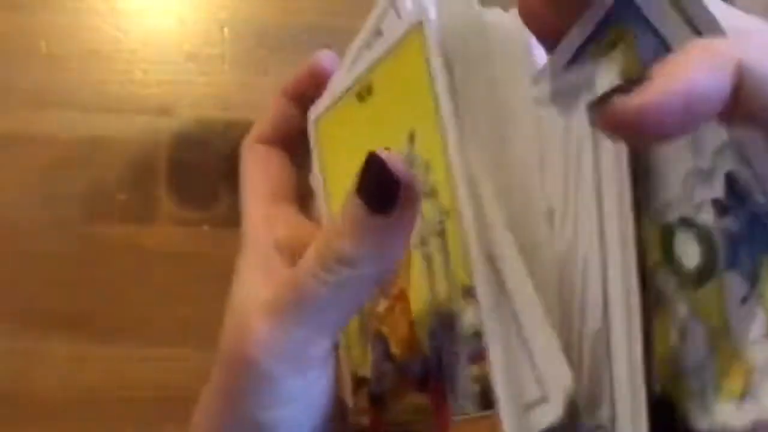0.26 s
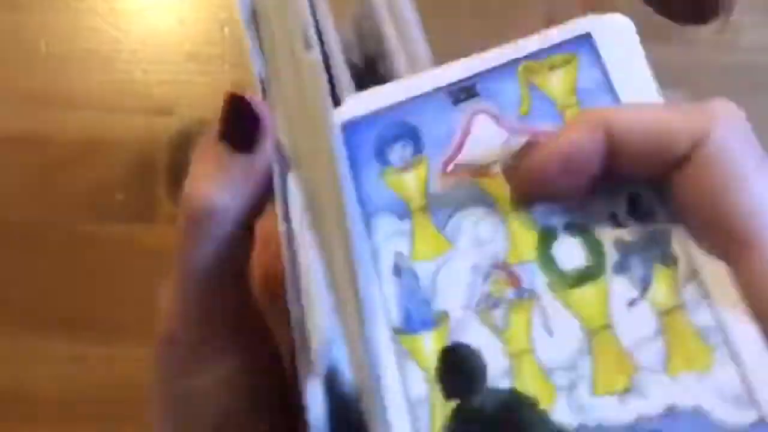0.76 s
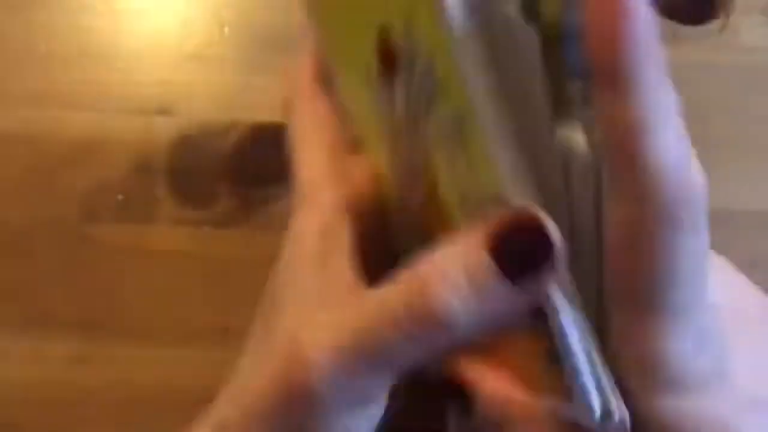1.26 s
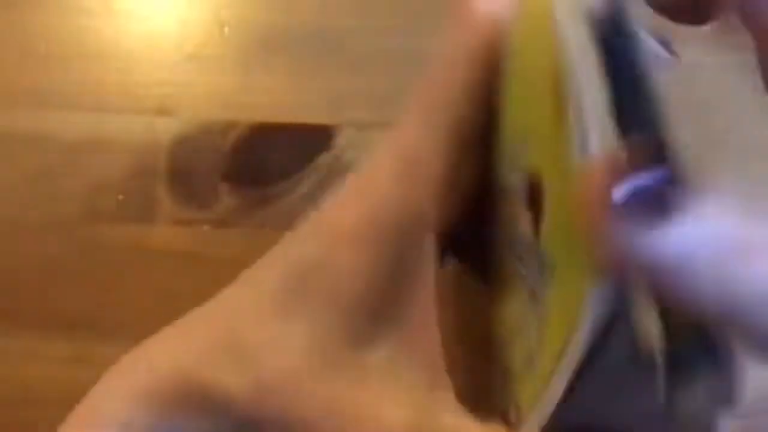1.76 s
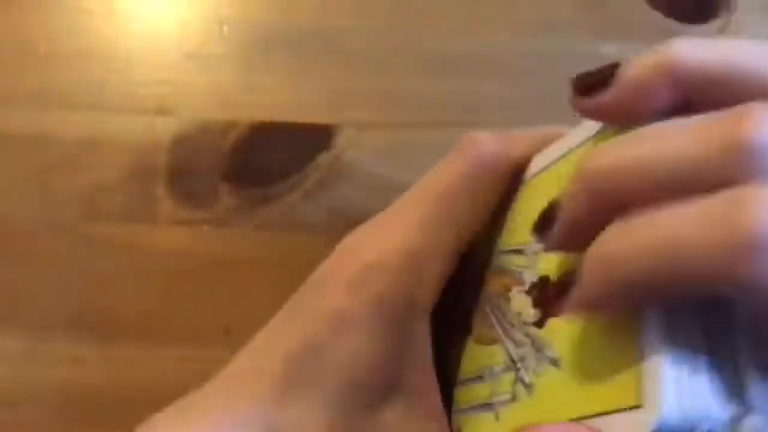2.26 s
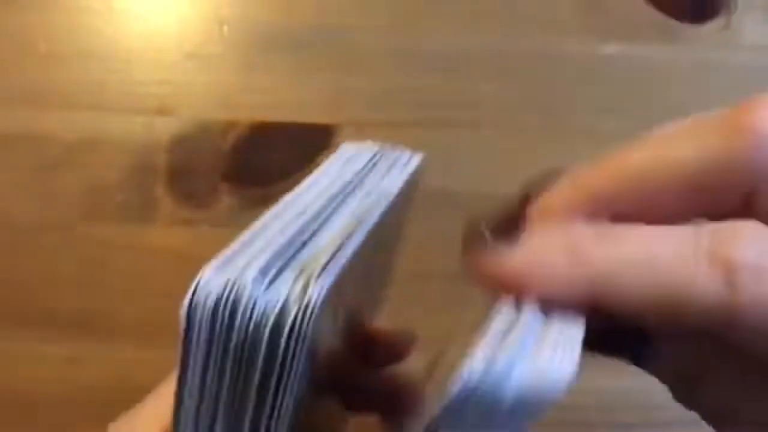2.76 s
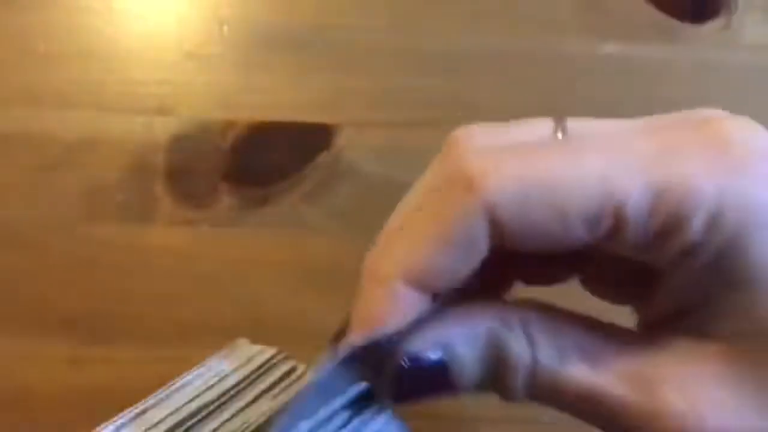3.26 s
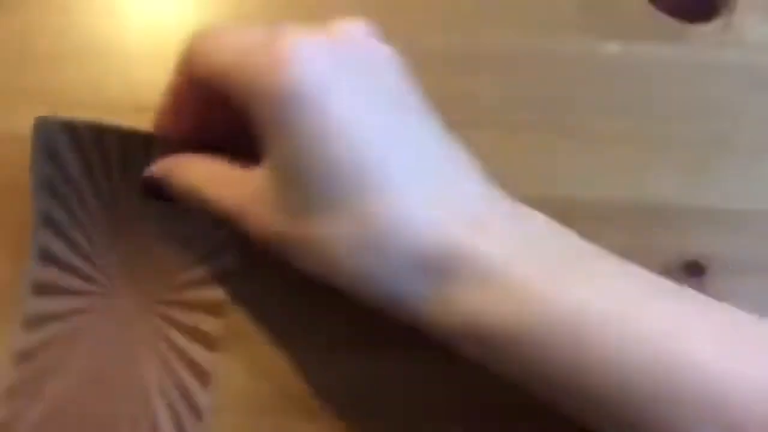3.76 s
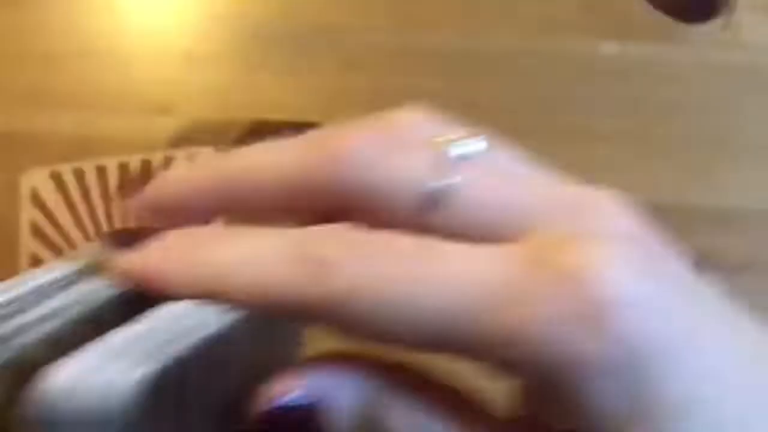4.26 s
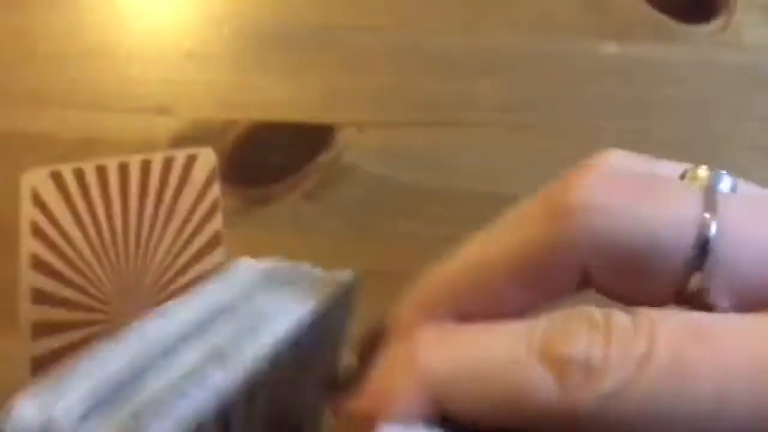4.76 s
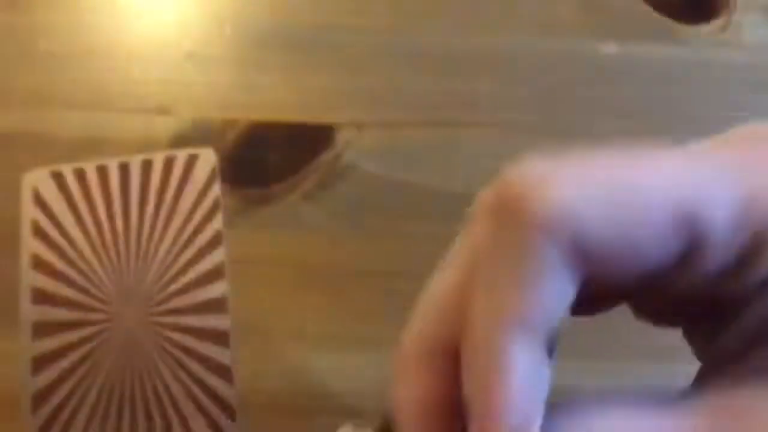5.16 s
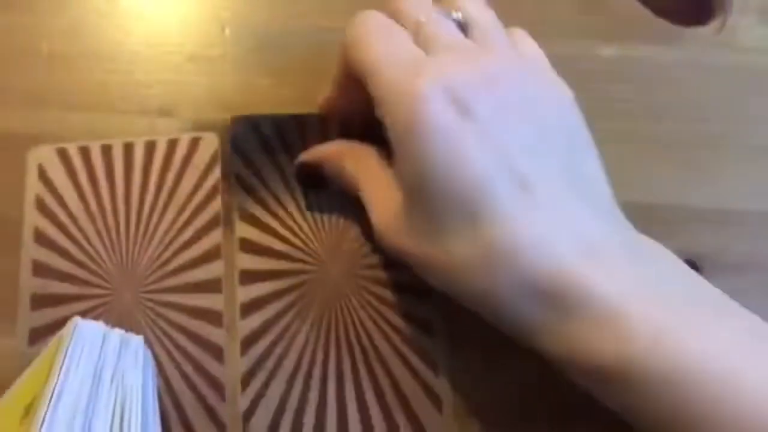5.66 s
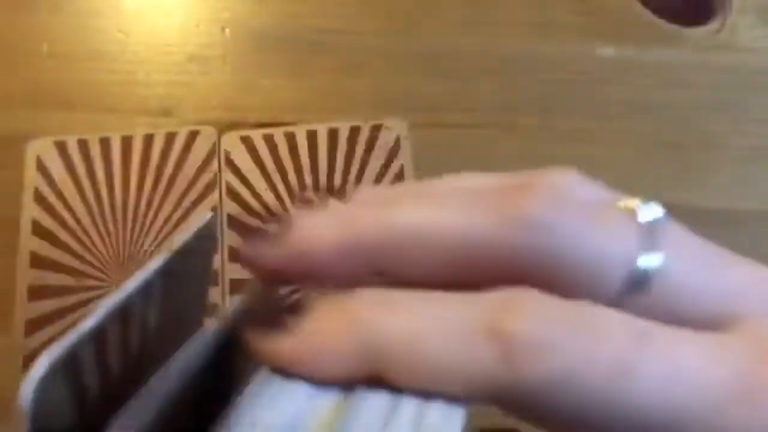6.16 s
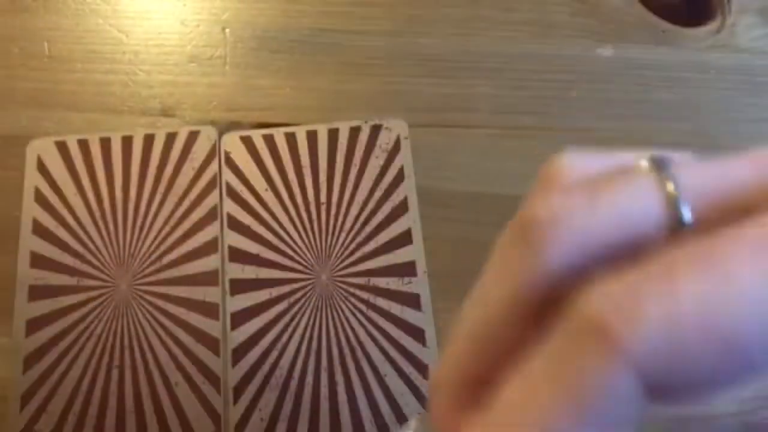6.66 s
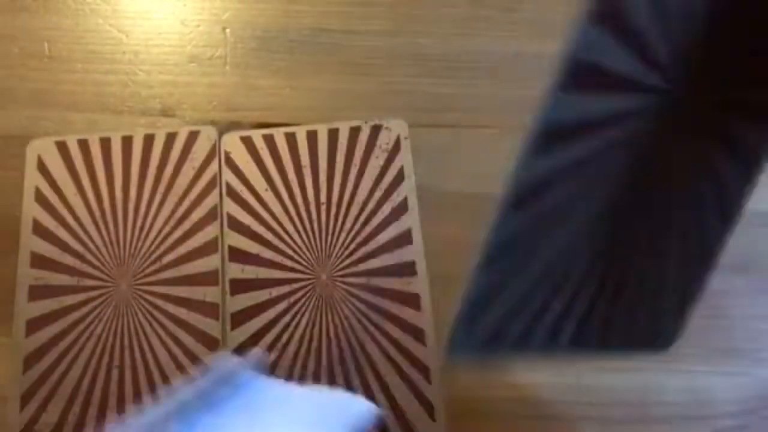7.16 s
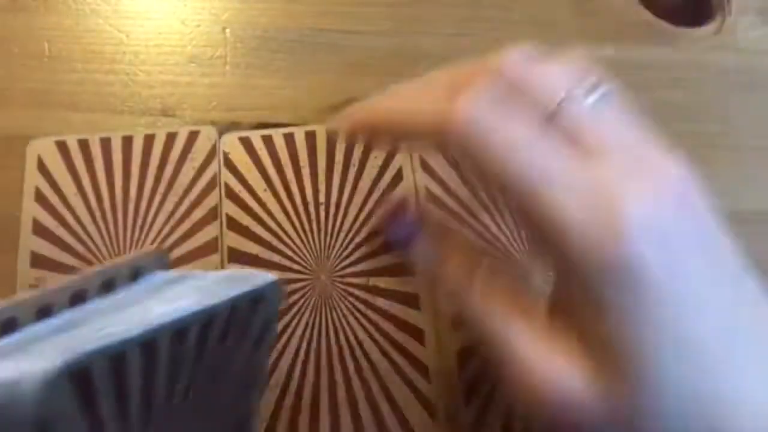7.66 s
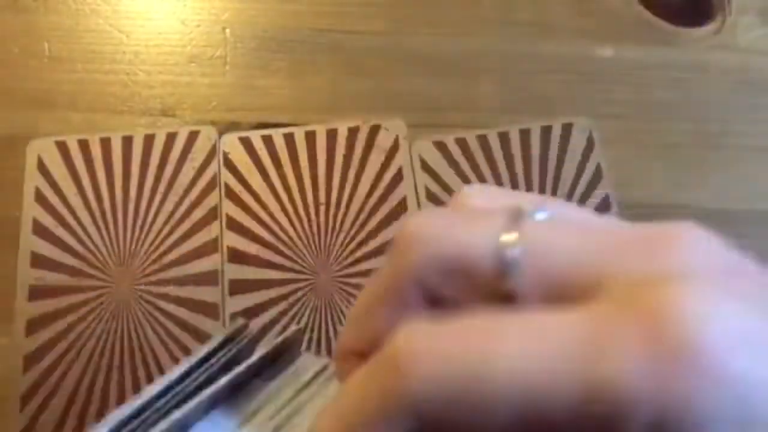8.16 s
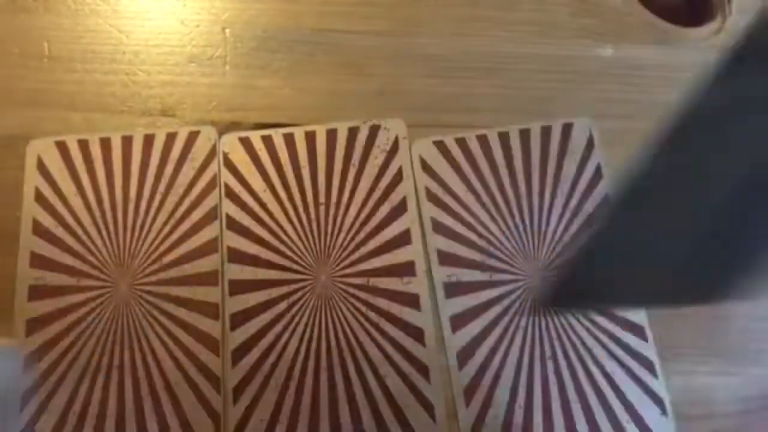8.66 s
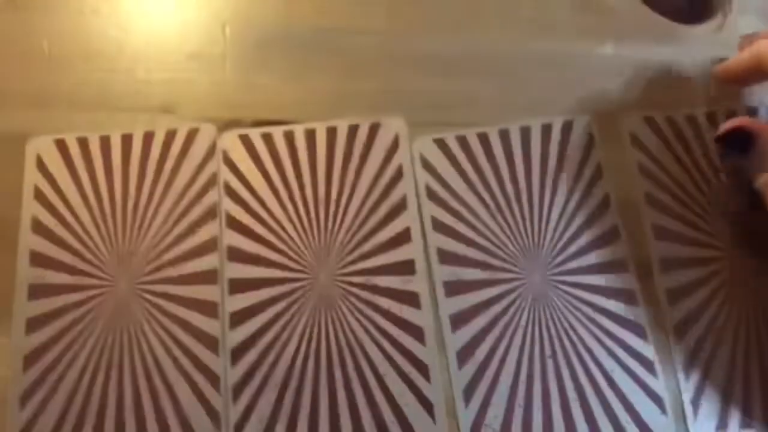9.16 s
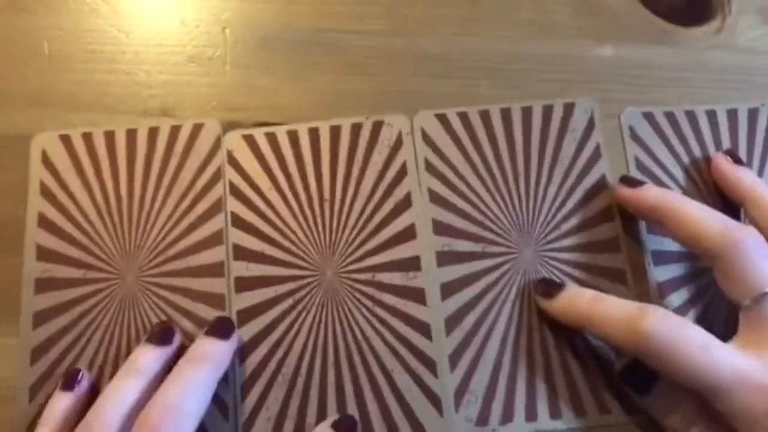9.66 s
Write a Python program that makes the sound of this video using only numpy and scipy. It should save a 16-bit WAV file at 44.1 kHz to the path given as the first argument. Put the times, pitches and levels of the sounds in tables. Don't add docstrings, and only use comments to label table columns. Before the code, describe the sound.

Close rustling and clicking of a hand-shuffled deck, a hard rap on wood, then four card flicks with soft landings and hissing slides.

```python
import sys
import numpy as np
from scipy import signal
from scipy.fft import rfft, irfft, next_fast_len
from scipy.io import wavfile

SR = 44100
rng = np.random.default_rng(int(sys.argv[2]) if len(sys.argv) > 2 else 0)


def gain_from_decibels(decibels):
    exponent = np.asarray(decibels, float) / 20
    return 10 ** exponent


def transcribe(signal):
    frames = np.atleast_2d(signal).T
    limited = np.clip(frames, -1, 1)
    pcm = np.round(limited * 32767).astype(np.int16)
    wavfile.write(sys.argv[1], SR, pcm)


N = 436590


def rms_one(x):
    return x / np.sqrt(np.mean(x ** 2) + 1e-20)


def peak_one(x):
    return x / (np.max(np.abs(x)) + 1e-12)


def lowpass(x, hz):
    return signal.sosfilt(signal.butter(2, hz, fs=SR, output="sos"), x)


def band(x, low_hz, high_hz):
    edges = [low_hz, min(high_hz, 0.49 * SR)]
    return signal.sosfilt(signal.butter(2, edges, "band", fs=SR, output="sos"), x)


def coloured(x, spectrum):
    hz, db = np.transpose(spectrum)
    size = next_fast_len(N)
    bins_hz = np.arange(size // 2 + 1) * SR / size
    gain_db = np.interp(np.log(bins_hz + 1), np.log(hz), db)
    return rms_one(irfft(rfft(x, size) * gain_from_decibels(gain_db), size)[:N])


def drift(rate):
    r = np.exp(-40 * np.pi * rate / SR)
    noise = rng.standard_normal(N // 20 + 2002)
    slow = rms_one(signal.lfilter([1], [1, -2 * r, r * r], noise)[2000:])
    return np.interp(np.arange(N) / 20, np.arange(len(slow)), slow)


def add(out, s, piece):
    i = max(round(s * SR), 0)
    out[i:i + len(piece)] += piece[:N - i]


# [Hz, dB per Hz]
ROOM_TONE = [(12, -34), (20, -4), (64, -4), (118, 0), (319, -12), (497, -15), (693, -14), (1640, -21),
             (3650, -23), (4820, -21), (5380, -18), (5850, -19), (7930, -21), (9900, -17), (15000, -20)]
ROOM_TONE_DB = -62.5
HUM_HZ, HUM_WIDTH_HZ, HUM_DB = 122, 21.5, -73


def room_tone():
    air = coloured(rng.standard_normal(N), ROOM_TONE)
    rumble = gain_from_decibels(-9.0 + 3.7 * drift(0.31)) * band(air, 5, 320)
    motor = band(rng.standard_normal(N), HUM_HZ - HUM_WIDTH_HZ / 2, HUM_HZ + HUM_WIDTH_HZ / 2)
    drone = gain_from_decibels(HUM_DB + 2.0 * drift(1.5)) * rms_one(motor)
    return gain_from_decibels(ROOM_TONE_DB + 0.98 * drift(0.6)) * (air + rumble) + drone


# [Hz, dB per Hz]
RUSTLE = [(120, -25), (200, -1.5), (650, -5), (804, -3), (900, -7), (1250, -8.5), (2750, -13),
          (4000, -15.5), (5200, -21), (8800, -120)]
# [s, dB]
HANDLING = [(0.0, -66), (0.13, -61.5), (1.2, -63), (1.85, -60), (1.98, -62), (2.21, -63), (2.26, -64),
            (3.1, -72), (3.3, -69.5), (3.64, -65), (5.05, -70), (5.54, -63), (6.1, -68.5), (6.35, -67.5),
            (6.62, -71), (8.57, -69), (9.02, -57), (9.9, -76.5)]
# [s, s, dB, Hz]
RUBS = [(0.045, 0.09, -62, 2300), (0.423, .1, -73, 514), (0.566, .06, -62, 2200), (0.662, .08, -66, 900),
        (0.855, 0.19, -63, 910), (1.266, 0.13, -58.5, 960), (2.096, 0.1, -59.5, 1320),
        (3.501, 0.0097, -58.5, 2400), (7.491, 0.051, -59, 1440), (3.18, 0.36, -68, 580),
        (3.916, 0.016, -59, 900), (5.518, 0.026, -55, 1500), (5.743, 0.024, -53.5, 900),
        (6.217, 0.29, -70, 695), (9.247, 0.14, -60, 380), (.15, .1, -65.5, 1450), (3.685, 0.034, -57, 1250),
        (7.119, 0.015, -62, 700), (1.897, 0.074, -60, 2400), (1.818, .04, -69, 2100),
        (7.37, 0.0089, -62, 1100), (7.35, 0.029, -57, 1600), (7.43, .015, -61, 1700),
        (8.185, 0.015, -61.5, 2070), (8.839, 0.074, -57, 1670), (8.979, 0.02, -63, 1980),
        (9.037, 0.054, -71, 990), (9.116, 0.068, -63.5, 1700)]
RUB_EDGE_S = 0.018


def handling():
    lumps = rng.standard_normal(N) * gain_from_decibels(3.5 * drift(90) + 2.5 * drift(14))
    seconds, level_db = np.transpose(HANDLING)
    squeeze_db = np.interp(np.arange(N) / SR, seconds, level_db)
    out = gain_from_decibels(squeeze_db - 3.0) * coloured(lumps, RUSTLE)
    for s, length, db, centre_hz in RUBS:
        t = np.arange(-RUB_EDGE_S, length + RUB_EDGE_S, 1 / SR)
        fade = np.clip(np.minimum(t, length - t) / RUB_EDGE_S + 1, 0, 1)
        grain = band(lumps[int(s * SR):][:len(t)], centre_hz / 1.87, centre_hz * 1.34)
        add(out, s - RUB_EDGE_S, gain_from_decibels(db) * rms_one(grain) * fade)
    return out


# [s, dB, Hz, s]
TICKS = [(.034, -30.5, 6330, 0.0086), (.0889, -47, 7540, 0.013), (.1048, -43, 12860, 0.006),
         (.5703, -51.5, 9850, .0083), (.6175, -33.5, 4730, 0.0027), (.7566, -37.5, 9050, 0.0025),
         (1.519, -36, 5450, 0.027), (1.526, -42, 5640, 0.0053), (1.6703, -45.5, 6160, 0.0091),
         (1.8798, -34.5, 3580, 0.00068), (3.018, -47, 13200, 0.0086), (3.495, -45, 9200, 0.018),
         (3.6707, -39, 3160, 0.0024), (3.929, -34.5, 5600, 0.0077), (3.9394, -31, 7750, 0.0031),
         (5.0063, -48.5, 6360, 0.0091), (5.3235, -37.5, 6100, 0.0038), (5.5139, -41, 9200, 0.0053),
         (5.7001, -53, 14470, .014), (5.7491, -26, 5960, 0.0032), (5.7512, -28, 8600, 0.0034),
         (7.3377, -42.5, 5650, 0.0012), (7.487, -33, 6140, 0.007), (7.8014, -48.5, 11470, 0.0086),
         (8.578, -41, 5200, 0.025), (8.8294, -32, 4860, 0.0023), (8.9863, -39, 10900, 0.002),
         (8.9998, -40.5, 6740, 0.0049), (9.043, -56, 2600, 0.0078), (9.1644, -51, 6580, .0106)]
# [s, dB, Hz]
FLECKS = [(0.606, -44, 5300), (0.6487, -46, 2820), (0.8364, -40, 9550), (0.877, -49, 9150),
          (0.914, -48, 9150), (1.003, -52, 10920), (1.0492, -49, 12270), (.26, -54, 11900),
          (.4469, -54, 10100), (.459, -52, 4200), (.5387, -55, 8860), (1.0155, -56, 13000),
          (1.0705, -48, 13300), (1.1488, -47, 11500), (1.509, -50, 11500), (1.5748, -48, 6900),
          (9.276, -57, 6000), (1.587, -48, 9900), (2.102, -42, 10400), (2.363, -45.5, 11400),
          (3.3593, -51, 10100), (3.8034, -48, 14200), (3.8936, -45, 14100), (4.1946, -44, 10600),
          (4.3775, -49, 9800), (4.4736, -49, 5800), (4.5337, -51.5, 11230), (4.9455, -55, 9900),
          (5.3015, -53, 11700), (6.142, -46, 11400), (6.159, -51, 10000), (6.184, -44, 13800),
          (6.3622, -63, 14300), (6.4235, -48, 10400), (7.0604, -47, 6740), (7.6715, -50, 13400),
          (8.122, -49, 9800), (8.4737, -51, 14200), (9.209, -45.5, 6630), (9.683, -53, 5430)]
FLECK_BURST_S = 0.00365


def ticks():
    out, t = np.zeros(N), np.arange(1400) / SR
    rows = TICKS + [(*fleck, FLECK_BURST_S) for fleck in FLECKS]
    white = rng.standard_normal((len(rows), 2, len(t)))
    for (s, peak_db, centre_hz, burst), (fine, grain) in zip(rows, white):
        u = t / np.clip(burst - 0.0006, 0.0004, 0.015)
        crackle = fine * gain_from_decibels(6.0 * grain) * u ** 1.58 * np.exp(-3.5 * u ** 2)
        flex = band(crackle, centre_hz * 0.897, centre_hz * 1.115)
        crack = band(crackle, min(centre_hz * 0.59, 7000), min(centre_hz * 2.4, 15500))
        tick = peak_one(0.96 * rms_one(crack) + 0.55 * rms_one(flex))
        add(out, s + 0.00017, gain_from_decibels(peak_db + 6.0) * tick)
    return out


def bounce(x, seconds, shares):
    touches = np.zeros(int(max(seconds) * SR) + 1)
    touches[(seconds * SR).astype(int)] = shares
    return signal.fftconvolve(x, touches)[:len(x)]


# [Hz, dB]
WOOD = [(215, -40), (280, -14), (370, -2.5), (475, 6), (630, 5), (710, 9.5), (800, 15.5), (960, 13),
        (1060, 18), (1270, 18.5), (1450, 5.5), (1750, 10), (2060, 6.5), (2500, -2.5)]
# [s, dB, dB, dB, s]
SHUFFLE_BLOWS = [(0.035, -30.5, -14, 12, 0.0069), (0.088, -43.5, -14, -2, 0.0031),
                 (0.102, -40.5, -4, 7.5, 0.0074), (0.6167, -36.5, -11, 8.5, 0.0022),
                 (0.7558, -43, -20, 6.5, 0.0034), (1.277, -44, 3, -6, 0.01), (1.523, -40.5, 2.5, 3, 0.0036),
                 (1.874, -23, -12, 0, 0.0059), (1.8795, -19.5, -9.5, 14, 0.0026),
                 (1.8975, -16.5, -29, -9.5, 0.0038), (1.9147, -23.5, -10, -1, 0.00524),
                 (1.926, -32, -1, -8, .004), (1.961, -36, 10, -26, 0.0038), (2.124, -42.5, -1, -25, 0.0076),
                 (2.2, -47.5, -9, -1, .005)]
# [s, dB, dB, dB, s]
HAND_SNAPS = [(1.8023, -29.5, -15, -27, 0.0081), (1.8062, -26.5, -32, 7.5, 0.004),
              (3.4982, -47.5, 14.5, 6, 0.007), (3.6692, -36, 0.5, -2, 0.003),
              (5.322, -23.5, 3.5, 1.5, 0.0029), (5.5112, -30.5, -19, -3, 0.0032),
              (5.5177, -35.5, -10, 5, 0.0074), (6.604, -40, 6, 11, 0.00242),
              (7.3386, -28.5, 5, 5.5, 0.0025), (8.579, -43, 19.5, 10, 0.0089),
              (8.828, -26, -23.5, -3, 0.0022)]
# [s, dB, dB, dB, s]
TABLE_BLOWS = [
    (3.9288, -34, 5, 15, 0.0045),
    (3.9383, -34.5, 4, -13, 0.006),
    (5.75, -31.5, 3.5, -8.5, 0.004),
    (5.7567, -35.5, -2, -1, 0.0055),
    (7.451, -37.5, 3, -11, 0.0057),
    (7.486, -34, 10, -7.5, 0.0071),
    (8.9961, -42, -10, 6, 0.006),
    (9.018, -39, -18, -19, .004),
    (9.2226, -33.5, 6, -12, 0.0042),
    (9.236, -43, 7, -34, 0.01),
]
# [s, dB, dB, dB]
TAPS = [(.245, -50, -8, 11), (0.3565, -54, -15, 15), (.388, -54, -15, 9), (0.46, -53.5, 0, -9),
        (.495, -53, 17, -9), (0.5937, -48, -0.5, -16.5), (0.6493, -47, -13, 7), (0.747, -49, -15, -2),
        (0.8358, -44, 8, 0), (0.9337, -48.5, -6, -17.5), (1.0292, -52, -3, 9), (1.33, -52, -15, 11),
        (1.371, -59, -13, -3), (4.2068, -55.5, -10, -18.5), (4.222, -56, 1, -20), (5.2256, -54, 4, -10),
        (6.43, -54, 2.5, -9), (6.552, -52, 6, 14), (7.1197, -49, 8, -6), (7.365, -47, 3, 6),
        (8.1834, -57, -2, 6), (8.226, -53.5, -19, -30), (8.6068, -46.5, 5.5, 2), (2.003, -50, 6, 0),
        (2.04, -45, 1.5, -5), (2.155, -46, 3, 3), (1.94, -35, 1, -2), (2.075, -44, 1, 0), (2.18, -48, 0, 3),
        (.8, -49, 2, -4), (1.046, -56, -5, 6)]
TAP_SPREAD_S = 0.00492
IN_HAND_ROOM_DB, ON_TABLE_ROOM_DB = -6, 0.5
CENTRE_HZ, WEIGHT_SINKS_OCT_PER_DB, HARD_LIFTS_OCT_PER_DB = 1080, 0.54, 0.16
HEAVY_BELOW_HZ, HARD_ABOVE_HZ = 500, 1350
CONTACT_S, WOOD_T60_S = 0.0007, 0.011


def knocks():
    out, t = np.zeros((5, N)), np.arange(3000) / SR
    hz, db = np.transpose(WOOD)[:, :, None]
    decay = gain_from_decibels(-60 * t / (WOOD_T60_S * (800 / hz) ** 1.24))
    modes = -np.sin(2 * np.pi * hz * t) * np.minimum(t / CONTACT_S, 1) * decay
    rows = [(*blow, 0) for blow in SHUFFLE_BLOWS]
    rows += [(*snap, IN_HAND_ROOM_DB) for snap in HAND_SNAPS]
    rows += [(*blow, ON_TABLE_ROOM_DB) for blow in TABLE_BLOWS]
    rows += [(*tap, TAP_SPREAD_S, 0) for tap in TAPS]
    chance = rng.random((len(rows), 2 + len(WOOD)))
    for k, (row, c) in enumerate(zip(rows, chance)):
        s, peak_db, weight_db, hard_db, spread, room_db = row
        shift_oct = HARD_LIFTS_OCT_PER_DB * hard_db - WEIGHT_SINKS_OCT_PER_DB * max(weight_db, 0)
        reach_db = -6.0 * np.log2(hz / (CENTRE_HZ * 2 ** shift_oct)) ** 2
        reach_db = np.where(hz > HARD_ABOVE_HZ, hard_db - 0.6, reach_db)
        reach_db = np.where(hz < HEAVY_BELOW_HZ, weight_db - 13.0, reach_db)
        blow_db = 3 * c[2:, None]
        touch = peak_one(np.sum(gain_from_decibels(db + reach_db + blow_db) * modes, axis=0))
        roll, again = np.clip(spread, 0.001, 0.017), np.clip(spread / 0.0055, 0.1, 0.9)
        gaps = np.r_[0, 0.3 + 0.2 * c[0], 0.65 + 0.2 * c[1], 1.2 + 0.4 * c[2]]
        body = bounce(touch, roll * gaps, [1, -again, again, -again / 2])
        add(out[0], s + 0.000857, gain_from_decibels(peak_db + 3.0) * peak_one(body))
        sent_db = peak_db + 4.3 * again + room_db + 0.9 * np.log2(spread / 0.0011)
        add(out[1 + k % 4], s + 0.00034, touch * gain_from_decibels(sent_db))
    return lowpass(out, 2900)


# [Hz, s, dB]
ROOM = [(110, 0.52, -14.5), (231, 0.56, -11.5), (380, 0.55, -14.5), (720, 0.5, -15.5), (1110, 0.66, -14.5),
        (1540, 0.58, -15), (2400, 0.52, -15), (3300, 0.56, -15), (6100, 0.93, -25), (8900, 0.036, -21.5),
        (12400, 0.26, -44)]


def room(spots):
    t, out = np.arange(SR * 3 // 4) / SR, 0
    onset = np.clip((t - 0.002) / 0.0004, 0, 1)
    for x in spots:
        white, tail = rng.standard_normal((2, len(t))), 0
        for k, (hz, t60, db) in enumerate(ROOM):
            noise = rms_one(band(white[k % 2], hz / 1.27, hz * 1.27))
            dying = noise * np.sqrt(hz / SR) * gain_from_decibels(-60 * t / t60)
            tail = tail + gain_from_decibels(db) * dying * np.sqrt(14 / (t60 * SR))
        out = out + signal.fftconvolve(x, tail * onset)[:N]
    return out


def bending_modes(rows, twin):
    out, t = np.zeros(N), np.arange(20000) / SR
    for s, peak_db, centre_hz, ring in rows:
        fade = (1 - np.exp(-t / 0.0027)) * gain_from_decibels(-60 * t / np.clip(ring, 0.015, 0.6))
        turn = 2 * np.pi * centre_hz * t
        tone = np.sin(turn) + twin * np.sin(1.2 * turn)
        add(out, s, gain_from_decibels(peak_db) * peak_one(tone * fade))
    return out


# [s, dB, Hz, s]
RINGS = [(.038, -44.5, 1300, 0.065), (1.808, -36, 812, 0.23), (1.876, -32, 900, 0.14),
         (1.9, -40, 476, 0.16), (5.513, -37.5, 1256, 0.037), (5.752, -39, 487, 0.063),
         (8.565, -53, 1760, 0.16), (8.997, -40, 1140, 0.021), (9.019, -43.5, 828, 0.14),
         (9.224, -46, 214, 0.51), (9.226, -45.5, 635, 0.12)]


def rings():
    return bending_modes(RINGS, twin=0.38)


# [s, s, dB, Hz, Hz]
SCRAPES = [(9.112, .035, -61, 3000, 4300), (9.16, 0.084, -65, 6700, 6700),
           (8.575, 0.043, -55.5, 5100, 5100), (1.2, .06, -56, 11500, 13000), (1.3, .03, -58, 12000, 11500),
           (5.755, 0.068, -56, 8500, 7600), (5.335, .1, -61, 1450, 1350), (.045, .12, -59, 1350, 1350),
           (0.041, .1, -64, 2300, 2300), (.355, 0.057, -68, 2200, 2200), (2.09, 0.122, -63, 1800, 1750),
           (8.828, .008, -49, 4600, 4600), (7.338, .008, -57.5, 4600, 5200), (8.85, 0.082, -64, 2200, 2200),
           (8.21, 0.029, -60, 700, 710), (.59, 0.06, -64, 3000, 2100), (5.525, 0.028, -69, 2900, 3100)]
SCRAPE_WIDTH_SHARE = 0.25


def scrapes():
    out, white = np.zeros(N), rng.standard_normal((len(SCRAPES), 2, 6000))
    for (s, length, db, from_hz, to_hz), pair in zip(SCRAPES, white):
        u = np.arange(int(min(length, 0.13) * SR)) / (length * SR)
        a, b = lowpass(pair, SCRAPE_WIDTH_SHARE * to_hz / 2)[:, :len(u)]
        turn = 2 * np.pi * np.cumsum(from_hz + (to_hz - from_hz) * u) / SR
        hiss = rms_one(a * np.cos(turn) + b * np.sin(turn))
        add(out, s, gain_from_decibels(db) * hiss * np.sin(np.pi * u) ** 0.47)
    return out


# [s, s, dB, dB]
SHUFFLE_SLIDES = [(0.045, 0.056, -56.5, 9), (0.127, 0.12, -70, 15), (.31, 0.086, -55, -3),
                  (0.404, 0.095, -63, 7), (0.56, 0.2, -60, 1), (0.756, 0.14, -56, 2), (0.836, 0.34, -58, 3),
                  (0.773, 0.021, -53.5, 2), (1.146, .025, -56.5, -5), (0.08, 0.026, -53, 0),
                  (1.267, 0.13, -51.5, -4), (1.49, 0.037, -56, 7), (1.55, 0.045, -54, -6),
                  (1.891, 0.057, -52, -5), (1.955, 0.13, -61, -4), (2.072, 0.12, -55.5, -4),
                  (2.353, 0.033, -61, 9), (2.483, 0.069, -53.5, -3), (2.71, 0.14, -64.5, 7),
                  (2.908, 0.026, -62.5, 6), (2.957, 0.085, -64.5, 4)]
# [s, s, dB, dB]
DEAL_SLIDES = [(3.364, 0.075, -63.5, 7), (3.52, .08, -61, 5.5), (3.674, 0.16, -52.5, -5.5),
               (3.92, 0.23, -53, 1), (4.177, 0.08, -60, -2), (4.388, 0.049, -54.5, 4.5),
               (4.582, 0.06, -62.5, 3.5), (4.873, 0.065, -63, 4), (5.001, 0.038, -58, -2),
               (5.25, 0.32, -57.5, -1.5), (5.506, 0.17, -55, -4), (5.705, 0.06, -51.5, -1),
               (5.755, 0.25, -50.5, -12.5),
               (6.084, 0.11, -57, 0), (6.256, 0.26, -58, -3.5), (6.582, 0.13, -58.5, -4),
               (7.034, 0.1, -61.5, 7.5), (7.188, 0.038, -58, 2), (7.342, .13, -54, -7.5),
               (7.492, 0.096, -47.5, -11.5), (7.622, 0.046, -61.5, 3.5), (7.78, 0.16, -69, 12),
               (8.004, 0.021, -63.5, 8), (8.098, 0.1, -58.5, -3), (8.276, 0.089, -59, -3),
               (8.567, 0.01, -49, 5.5), (8.62, 0.16, -67, 13), (8.842, 0.11, -48, -11.5),
               (8.996, 0.026, -46.5, -7), (9.077, 0.15, -55.5, 5), (9.242, 0.17, -57.5, 0),
               (9.583, 0.074, -52.5, -5.5), (9.68, 0.059, -60, -2)]
SWELL_DB_PER_S, DIE_DB_PER_S, GRIP_DB = 352, 272, -80


def slip_db():
    t, out = np.arange(0, N, 32) / SR, GRIP_DB
    for s, length, db, change_db in SHUFFLE_SLIDES + DEAL_SLIDES:
        held = db + change_db * np.clip((t - s) / length, 0, 1)
        before = SWELL_DB_PER_S * np.maximum(s - t, 0)
        after = DIE_DB_PER_S * np.maximum(t - s - length, 0)
        out = np.maximum(out, held - before - after)
    return np.interp(np.arange(N) / SR, t, out)


# [Hz, dB per Hz]
HISS = [(1600, -40), (2700, -12), (3900, -12), (4250, -6), (4900, -5), (5350, -2.5), (5900, -6), (6550, 2),
        (7800, -7), (9900, 3.5), (11300, 0), (12700, -1), (14600, 2)]
PATCH_EDGES_HZ = [2000, 4900, 5900, 7600, 9200, 11000, 13000, 16000]
SLIDE_TILT_DB = -0.75


def sliding():
    flutter_db = 6 * np.tanh(0.3 * drift(10) + 0.4 * drift(30) + 0.45 * drift(120))
    slips = rng.standard_normal(N) * gain_from_decibels(2.8 * np.minimum(rng.exponential(1, N), 5))
    hiss, out = coloured(slips, HISS), 0
    for k, (low, high) in enumerate(zip(PATCH_EDGES_HZ, PATCH_EDGES_HZ[1:])):
        lean = np.clip(np.log2(low * high / 8000 ** 2), -1, 1)
        patch_db = 2.8 * drift(14) + 1.2 * drift(3)
        sign = (-1) ** k
        out = out + sign * band(hiss, low, high) * gain_from_decibels(lean * SLIDE_TILT_DB + patch_db)
    return gain_from_decibels(slip_db() + flutter_db - 3.0) * out


# [s, dB, Hz, Hz, dB]
FLEXES = [(1.8035, -27, 480, 390, 7), (3.5, -45, 1020, 560, 17), (3.671, -34, 338, 424, -1),
          (7.3392, -29.5, 495, 504, 4.5), (8.8292, -21.5, 707, 480, 4), (1.8985, -18.5, 490, 500, 0),
          (5.3228, -25, 477, 380, 0.5), (5.5115, -35, 420, 400, 2), (7.4885, -29.5, 488, 443, 1),
          (.6172, -37, 720, 430, -6), (3.675, -33, 710, 524, 5), (8.2265, -46, 700, 300, 18),
          (8.609, -38, 450, 403, -0.5)]
FLEX_RING_S, FLEX_ROOM_DB = 0.028, -9


def flexes():
    out, t, k = np.zeros(N), np.arange(2500) / SR, np.arange(4)[:, None]
    for s, peak_db, low_hz, step_hz, loss_db in FLEXES:
        hz = low_hz + step_hz * k
        ring_s = FLEX_RING_S * (800 / hz) ** 0.31
        modes = np.sin(2 * np.pi * hz * t) * gain_from_decibels(-loss_db * k - 60 * t / ring_s)
        card = np.sum(modes * (-1) ** k, axis=0) * np.minimum(t / 0.0013, 1)
        add(out, s, gain_from_decibels(peak_db) * peak_one(card))
    return out


# [s, dB, Hz, s]
THUMPS = [(1.899, -32.5, 160, 0.016), (3.932, -51, 138, 0.036), (5.321, -39.5, 78, 0.037),
          (5.51, -50.5, 31.7, 0.15), (5.751, -41, 132, 0.013), (7.488, -44, 122, 0.059),
          (8.604, -44, 102, 0.027), (9.012, -48.5, 130, 0.061), (9.024, -46, 28.8, 0.46),
          (9.2225, -28.5, 110, 0.014), (9.223, -40, 32, 0.43)]


def thumps():
    return bending_modes(THUMPS, twin=0)


def scene():
    knock, *far = knocks()
    tick, thump, flex = ticks(), thumps(), flexes()
    far[0] = far[0] + gain_from_decibels(3.0) * band(tick, 4000, 15000) + thump
    far[1] = far[1] + gain_from_decibels(FLEX_ROOM_DB) * flex
    walls = gain_from_decibels(12.0) * room(far)
    blows = knock + tick + thump + rings() + flex
    friction = scrapes() + sliding() + handling()
    return (blows + friction + walls + room_tone())[None]


def roll_off(x):
    return signal.sosfilt(signal.butter(12, 16340, fs=SR, output="sos"), x)


CUTOFF_HZ = 15000


def record(dry):
    steep = signal.ellip(12, 0.5, 60, CUTOFF_HZ, fs=SR, output="sos")
    mix = signal.sosfilt(steep, dry)
    return roll_off(mix)


dry = scene()
out = record(dry)
transcribe(out)
```